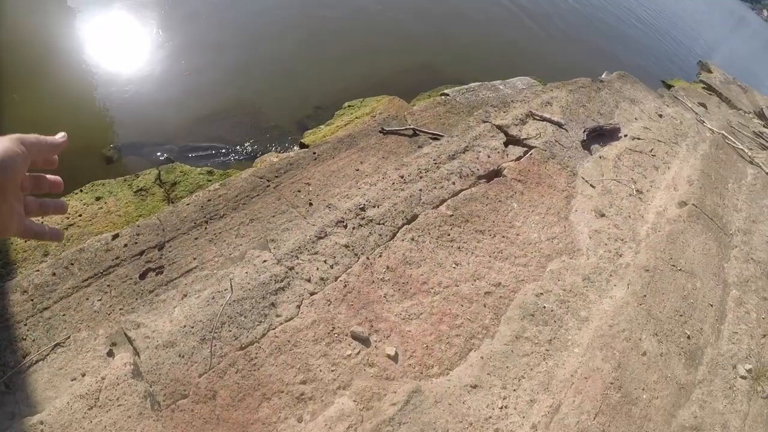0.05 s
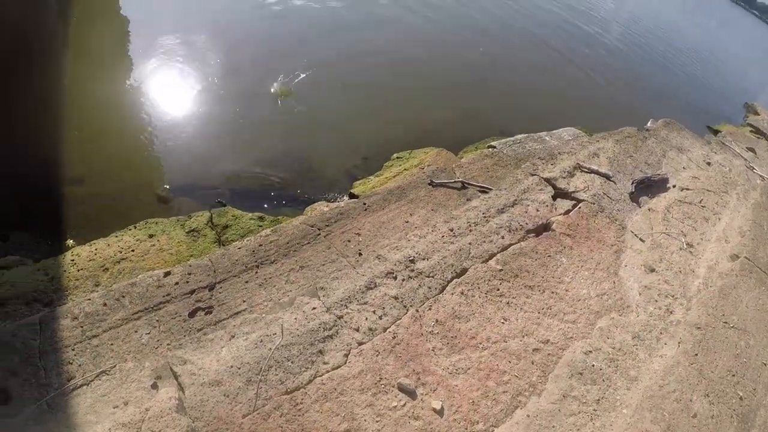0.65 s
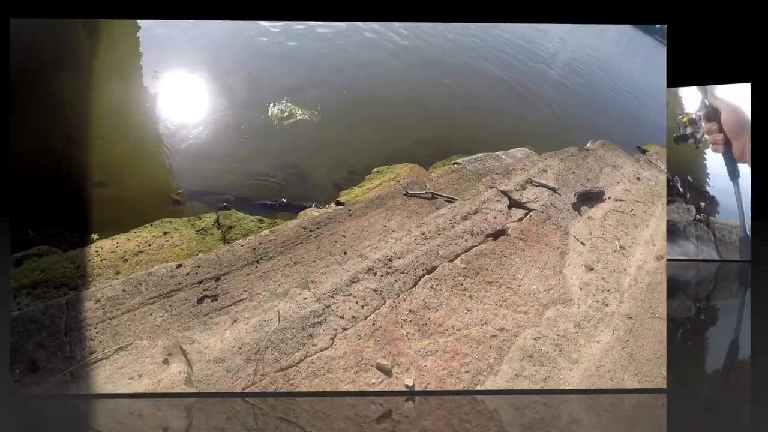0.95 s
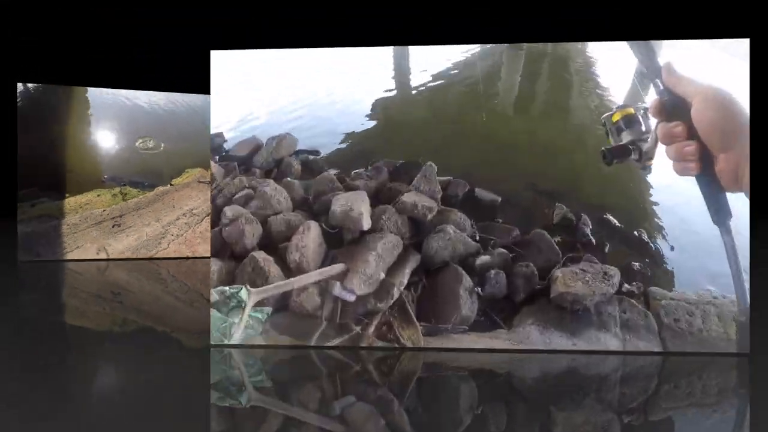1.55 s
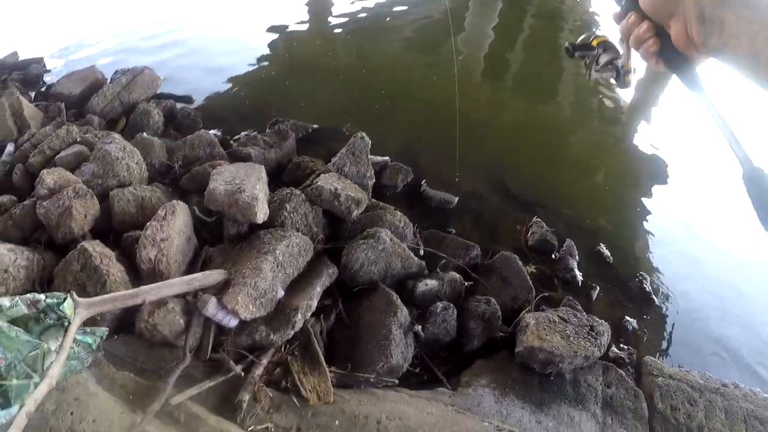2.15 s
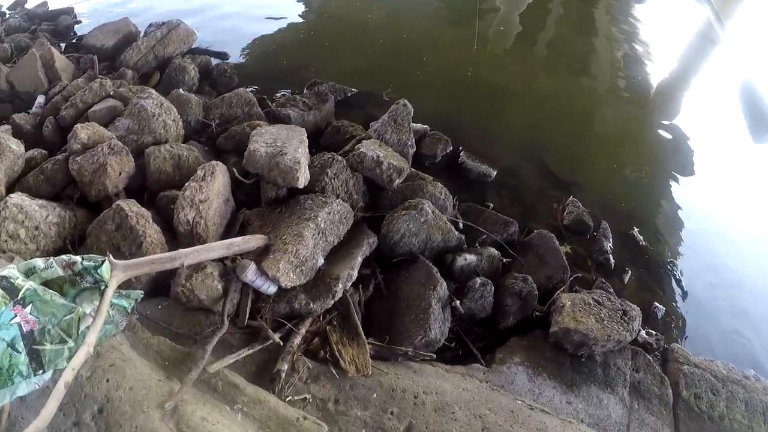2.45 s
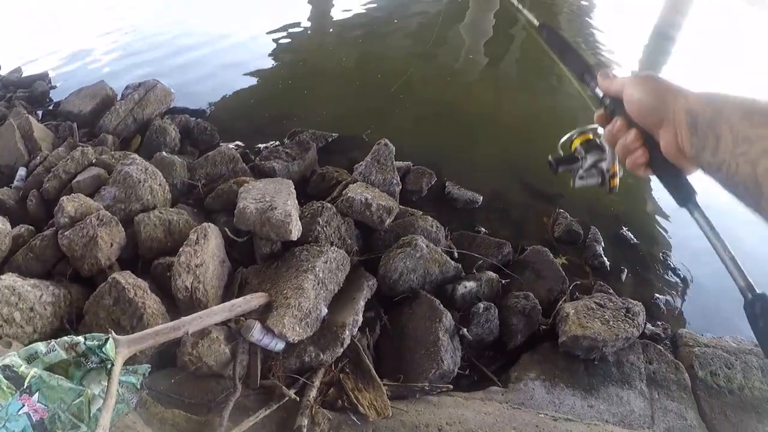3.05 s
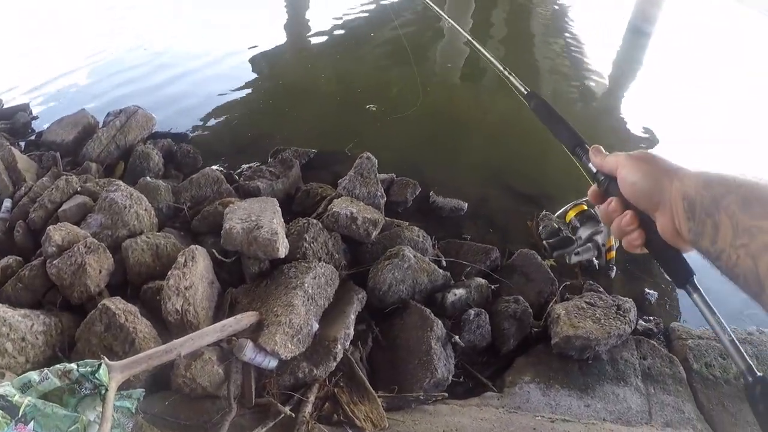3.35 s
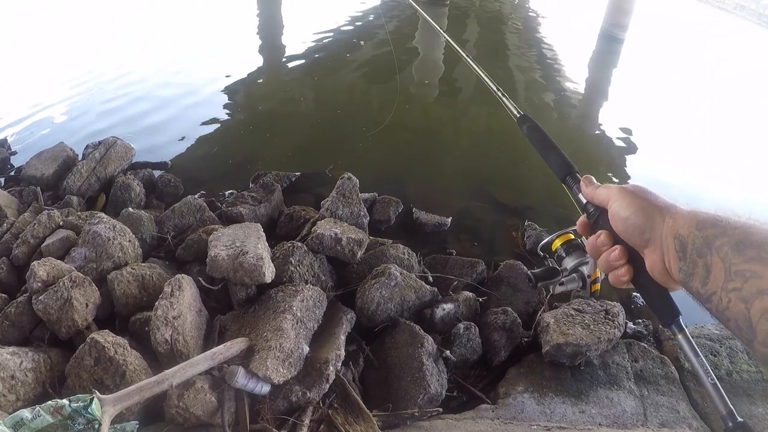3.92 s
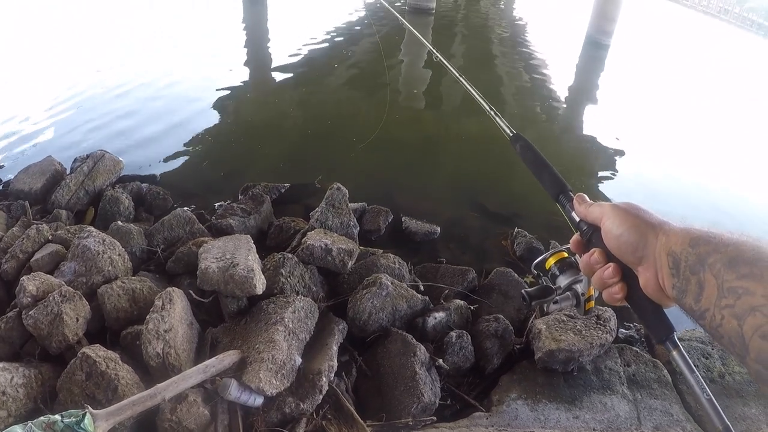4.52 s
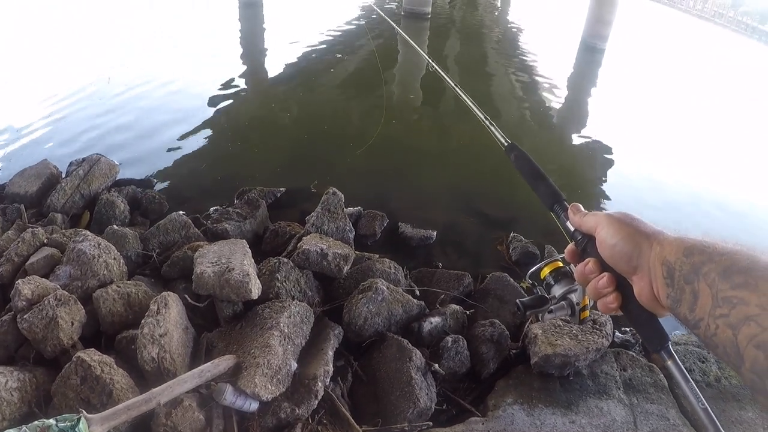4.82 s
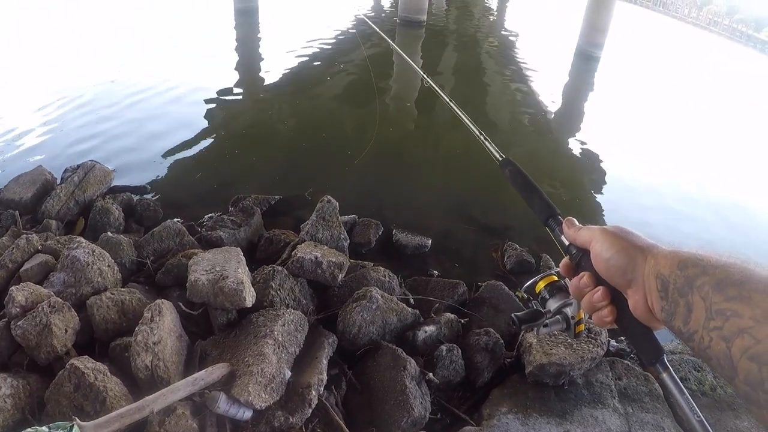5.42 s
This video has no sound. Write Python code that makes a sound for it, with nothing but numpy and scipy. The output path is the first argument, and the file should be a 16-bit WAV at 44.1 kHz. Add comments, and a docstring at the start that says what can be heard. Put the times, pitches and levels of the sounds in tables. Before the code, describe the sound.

Deep bridge rumble and tyre roar from above, broken by irregular metallic clanks and thuds that echo over the river bank.

```python
"""Heavy vehicle on a bridge

Heard from the river bank below, the rolling weight makes the deck rumble and settle into a drone.
Tyres roar, wheels bang over loose steel joints, and the blows echo between deck and water. Close by,
water spits at the bank, then comes one brief high whizz like a fishing line. A thin hiss hangs on."""
import sys
import numpy as np
from scipy import signal
from scipy.fft import rfft, irfft, next_fast_len
from scipy.io import wavfile
from scipy.ndimage import uniform_filter1d, minimum_filter1d, map_coordinates

SR = 44100
rng = np.random.default_rng(int(sys.argv[2]) if len(sys.argv) > 2 else 0)


def output_pcm(signal):
    """Save a mono or channel-first signal as 16-bit PCM at the path in sys.argv[1].

    Samples are clipped to [-1, 1] before scaling.
    """
    pcm = np.clip(np.atleast_2d(signal).T, -1, 1) * 32767
    wavfile.write(sys.argv[1], SR, np.round(pcm).astype(np.int16))


N = 250488
TIME = np.arange(N) / SR

# Levels are relative: the functions add their own gains. A fade time (t60) is the time to fall 60 dB.
# tone colour of each noise: (frequency [Hz], level [dB])
AIR_COLOUR = [(1000, -17), (2500, -1), (4400, -5.5), (5400, -10.5), (6800, -8.5), (7400, -9), (8500, -6),
              (10400, -13.5), (11300, -17), (13800, -21.5), (15000, -35)]
DECK_COLOUR = [(35, -31), (60, -18), (124, 2.5), (176, 3.5), (260, -16.5), (420, -24), (550, -79),
               (920, -120)]
ROAR_COLOUR = [(200, -23), (310, 6), (430, 3), (600, -3), (850, -7), (1200, -8.5), (1450, -27.5),
               (2200, -57.5), (6000, -120)]
RUSH_COLOUR = [(700, -10.5), (1300, 6), (2000, 2.5), (2900, -11), (4500, -13), (5600, -18), (7300, -21.5),
               (8600, -23), (10400, -26), (11500, -38.5), (15000, -49)]
BLOW_COLOUR = [(150, -5), (500, 0), (1200, -6), (1450, -13), (2100, -17.5), (3000, -26), (5000, -29.5),
               (6800, -35), (7400, -41.5), (10300, -42), (11500, -58.5), (15000, -72)]
# the thin high hiss: (time [s], level [dB])
HISS_LEVELS = [(0, -76), (.5, -64.5), (.65, -57), (1.3, -73), (2.6, -69), (3.2, -62), (5.68, -62)]
# small spits of water, then (last row) one brief high whizz like a fishing line:
# (time [s], level [dB], pitch [Hz], fade time [s])
SPITS_AND_WHIZZ = [(0.609, -38.5, 9950, 0.025), (0.628, -47, 8360, 0.07), (.66, -44, 5000, 0.046),
                   (0.694, -35, 4800, 0.11), (0.749, -38.5, 4700, 0.065), (.866, -52, 6960, .08),
                   (.948, -55, 7000, .05), (.976, -46, 4500, .05), (1.13, -38.5, 5460, 0.064),
                   (1.16, -45, 6950, 0.068), (1.699, -52, 9000, 0.2)]
# the deck's rumble under the weight: (time [s], level [dB])
RUMBLE_LEVELS = [(0, -17.5), (1.3, -17), (1.85, -12.5), (2.5, -13), (3.2, -13.0), (3.75, -14.5),
                 (4.25, -14), (4.65, -15), (5.15, -15), (5.68, -18.5)]
# axles bouncing the deck: (time [s], level [dB])
AXLE_BOUNCES = [(.06, -17.5), (.285, -15.5), (.565, -21), (1.46, -16.5), (1.70, -14), (1.83, -12),
                (2.135, -10.5), (2.19, -9), (3.12, -6.5), (4.16, -10.5), (4.28, -10.5)]
# the deck's deep tones: (pitch [Hz], first level [dB], change on arrival [dB], change on settling [dB],
# strength of the noise around the tone [ratio], width of that noise [octaves])
DECK_TONES = [(43.27, -34.5, 8.5, 2, 1.5, 0.35), (82.1, -34.5, 10.5, 6.5, 0.96, 0.2),
              (119.33, -28.5, 11, -2.5, 1.05, 0.16)]
# pitches at which the steel girders ring: (frequency [Hz], width [Hz], boost or cut [dB])
GIRDER_RESONANCES = [(360, 39, -2), (485, 16, 3.5), (546, 54, 2), (660, 36, 3), (820, 49, 3.5),
                     (1084, 22, 2), (1210, 21, -7.5), (1750, 270, 4), (2105, 570, 0.5), (4055, 1000, 5),
                     (6140, 650, 4)]
# tyres on the road: (time [s], growl and roar level [dB], rush level [dB])
TYRE_LEVELS = [(0.0, -25, -43.5), (1.09, -25.5, -41), (1.37, -26.5, -44), (1.71, -25, -41),
               (1.85, -25.5, -45.5), (2.4, -30.5, -48), (3.43, -31, -50.5), (3.54, -28.5, -43),
               (3.99, -31.5, -44), (4.3, -29, -43.5), (5.08, -28, -45), (5.68, -35.5, -48.5)]
# tones of a joint's steel plate: (pitch [Hz], level [dB], fade time [s])
PLATE_TONES = [(478, -1, .7), (582, 0, .8), (635, -3.5, .9), (690, 0, .9), (857, -3, .8), (974, -6, 1.0),
               (1103, -2, .8), (1174, -4, .9), (1228, -6, .7), (1778, -13.5, .8)]
# clang, clatter and rattle bands: (low edge [Hz], high edge [Hz], level [dB], fade time factor [ratio])
CLATTER_BANDS = [(734, 1290, -5.5, 0.87), (1390, 2940, -5.5, 1.1), (2770, 14000, -4.5, 0.96)]
# wheels hitting joints: (time [s], thud pitch [Hz], thud level [dB], clang pitch [Hz], clang level [dB],
# clatter level [dB], rattle level [dB], base fade time [s])
WHEEL_BLOWS = [(0.0, 480, -34, 1130, -27.5, -41, -51, 0.51),
               (.066, 453, -34, 1170, -20.5, -28, -40.5, 0.34),
               (.286, 252, -18, 1400, -22.5, -28, -37.5, 0.5),
               (.36, 400, -32.5, 900, -24.5, -34, -41, 0.62),
               (.41, 297, -28.5, 1060, -24, -32.5, -44.5, 0.69),
               (.561, 350, -47.5, 1030, -22.5, -31.5, -42, 0.45),
               (.783, 355, -20.5, 815, -21, -38, -55, 1.9), (.849, 435, -15.5, 1090, -23, -50, -45, 0.39),
               (.9, 350, -16.5, 1120, -19.5, -36, -53, 0.74),
               (.956, 465, -20.5, 877, -23.5, -53, -58, 0.94),
               (1.118, 450, -30.5, 890, -21, -26, -41, 0.42),
               (1.217, 400, -48.5, 1090, -29.5, -32.5, -47, 0.75),
               (1.525, 395, -25.5, 1030, -29, -34, -44.5, 0.95),
               (1.678, 387, -18, 630, -27.5, -50.5, -61, 0.8),
               (1.714, 394, -28.5, 900, -23.5, -30, -36.5, 0.62),
               (2.133, 430, -25, 870, -27, -38.5, -46.5, 0.64),
               (2.18, 418, -21, 1120, -29.5, -36, -46.5, 0.52),
               (2.49, 400, -34.5, 990, -50.5, -43.5, -51.5, 1.6),
               (2.668, 392, -24.5, 760, -27.5, -35, -44, 1.32),
               (3.084, 478, -28, 865, -38.5, -43.5, -52.5, 2.3), (3.14, 330, -28, 860, -30, -59, -54, 0.33),
               (3.378, 400, -32.5, 994, -30, -36, -47.5, .8),
               (3.41, 587, -41.5, 810, -26.5, -42, -57, 1.05), (3.49, 500, -45, 1180, -31, -39, -50.5, 1.1),
               (4.02, 397, -48, 1010, -38.5, -54.5, -48.5, 2.7),
               (4.173, 300, -22.5, 1040, -33.5, -30, -40.5, 1.5),
               (4.281, 350, -25, 980, -23.5, -29.5, -48, 0.64),
               (4.57, 457, -41, 1090, -36.5, -38.5, -55, 2), (5.027, 560, -12.5, 1155, -19, -24, -43, .58),
               (5.09, 560, -21.5, 1140, -19, -28.5, -45.5, 0.57),
               (5.145, 557, -13.5, 1140, -24.5, -30.5, -50, 0.63),
               (5.521, 537, -21.5, 820, -28, -46, -54, .27), (5.581, 510, -24, 654, -47, -57, -65, 0.81)]


def amp(db):
    """Turn decibels into a gain to multiply by."""
    return 10 ** (np.asarray(db) / 20)


def unit(x):
    """Scale a signal to an average (rms) level of 1."""
    return x / np.sqrt(np.mean(x ** 2) + 1e-20)


def colour_gain(colour, hz):
    """Read a tone colour table as a gain at each frequency."""
    points_hz, db = np.transpose(colour)
    return amp(np.interp(np.log(hz + 1), np.log(points_hz + 1), db))


def curves(rows):
    """Join a table's points in time: one curve for each column after the first."""
    times, *columns = np.transpose(rows)
    return [np.interp(TIME, times, column) for column in columns]


def ramp(start_s, length_s):
    """A straight rise from 0 to 1."""
    return np.clip((TIME - start_s) / length_s, 0, 1)


def wobble(rate):
    """A smooth curve through `rate` random values a second."""
    return map_coordinates(rng.standard_normal(int(N * rate / SR) + 4), [TIME * rate])


def noise(gain_at):
    """Noise of level 1, coloured by a gain for each frequency."""
    size = next_fast_len(N + 8192)
    spectrum = rfft(rng.standard_normal(N), size)
    hz = np.fft.rfftfreq(size, 1 / SR)
    return unit(irfft(spectrum * gain_at(hz), size)[:N])


def noise_around(centre_hz, octaves):
    """Noise of level 1 gathered around one pitch."""
    return noise(lambda hz: np.exp(-.5 * (np.log2((hz + 1) / centre_hz) / octaves) ** 2))


def steady(x, span_s):
    """Even out any swells slower than span_s."""
    size = max(int(span_s * SR), 8)
    power = uniform_filter1d(uniform_filter1d(x ** 2, size), size // 2)
    return x / np.sqrt(np.abs(power) + 1e-9)


def air(floor_db=-59, hiss_hz=6620, width_hz=260):
    """A faint, even noise and a narrow high hiss that comes and goes."""
    hiss = noise(lambda hz: np.exp(-.5 * ((hz - hiss_hz) / width_hz) ** 2))
    floor = noise(lambda hz: colour_gain(AIR_COLOUR, hz))
    return amp(floor_db) * floor + amp(curves(HISS_LEVELS)[0]) * hiss


def droplets(start_s=0.55, end_s=1.25, fade_s=.06, level_db=-58, centre_hz=6200, clump_db=4.5):
    """Fine droplets patter on the water in clumps."""
    window = ramp(start_s, fade_s) * (1 - ramp(end_s - fade_s, fade_s))
    clumps = amp(clump_db * wobble(70.4))
    return amp(level_db) * window * unit(clumps * noise_around(centre_hz, octaves=0.49))


def spits_and_whizz(octaves=0.34, grain_db=5.5, rise_share=0.019, sparkle_db=-24, sparkle_hz=11000):
    """Grainy bursts of noise: small spits of water, then one brief high whizz like a fishing line."""
    out = np.zeros(N)
    for start, db, centre_hz, t60 in SPITS_AND_WHIZZ:
        age = np.maximum(TIME - start, 0)
        burst = noise_around(centre_hz, octaves) + amp(sparkle_db) * noise_around(sparkle_hz, octaves)
        rise = 1 - np.exp(-age / (rise_share * t60))  # longer bursts start more softly
        out += amp(db - 60 * age / t60) * rise * burst
    grain = unit(amp(grain_db * wobble(830)))
    return out * grain


def deck_rumble(gain_db=-3.0, sway_db=1.5):
    """The rolling weight shakes the bridge deck, a little unevenly."""
    level = amp(curves(RUMBLE_LEVELS)[0] + gain_db + sway_db * wobble(12))
    return level * steady(noise(lambda hz: colour_gain(DECK_COLOUR, hz)), span_s=0.09)


def axle_bounces(gain_db=1, boom_hz=145, rise_s=0.013, t60=0.46):
    """Each bouncing axle gives the deck one soft, deep push that dies away."""
    power = np.zeros(N)
    for start, db in AXLE_BOUNCES:
        age = np.maximum(TIME - start, 0)
        power += (amp(db - 60 * age / t60) * np.tanh(age / rise_s)) ** 2
    boom = steady(noise_around(boom_hz, octaves=0.26), span_s=0.014)
    return amp(gain_db) * np.sqrt(power) * boom


def deck_drone(arrival_s=1.22, settling_s=4.25, build_cycles=32, drift_hz=2.36, flutter_db=3.0):
    """Three deep, rough, wavering tones swell as the vehicle arrives and shift as it settles."""
    out = np.zeros(N)
    for hz, db, arrival_db, settling_db, roughness, octaves in DECK_TONES:
        build_s = build_cycles / hz  # deeper tones swell more slowly
        swell_db = arrival_db * ramp(arrival_s, build_s) + settling_db * ramp(settling_s, build_s)
        cycles = np.cumsum(hz + drift_hz * wobble(5.9)) / SR + rng.random()
        tone = np.sqrt(2) * np.sin(2 * np.pi * cycles) + roughness * noise_around(hz, octaves)
        level = amp(db + swell_db + flutter_db * np.tanh(wobble(13)))
        out += level * steady(tone, span_s=9 / hz)
    return out


def girder_gain(hz):
    """The steel girders boost or cut some pitches of any sound passing through them."""
    return amp(sum(db / (1 + (2 * (hz - centre) / width) ** 2)
                   for centre, width, db in GIRDER_RESONANCES))


def tyres(growl_gain_db=1, growl_hz=232, roar_gain_db=-2, rush_gain_db=-2):
    """Rolling tyres growl, while their roar and brighter rush come through the girders."""
    low_db, high_db = curves(TYRE_LEVELS)
    growl = steady(noise_around(growl_hz, octaves=0.29), span_s=0.25)
    roar = noise(lambda hz: colour_gain(ROAR_COLOUR, hz) * girder_gain(hz))
    rush = noise(lambda hz: colour_gain(RUSH_COLOUR, hz) * girder_gain(hz))
    return (amp(low_db + growl_gain_db) * growl + amp(low_db + roar_gain_db) * roar
            + amp(high_db + rush_gain_db) * rush)


def plate_ring(gain_db=-10, hardness=0.7, rise_s=.008, spread_db=0.67):
    """A joint's plate rings a little differently each time, and most under the hardest blows."""
    out = np.zeros(N + SR)
    age = TIME[:SR]  # each ring gets one second
    hz, db, t60 = np.transpose(PLATE_TONES)[:, :, None]
    hardest_db = max(clang_db for _, _, _, _, clang_db, *_ in WHEEL_BLOWS)
    rise = 1 - np.exp(-age / rise_s)
    tones = amp(db - 60 * age / t60) * rise * np.exp(2j * np.pi * hz * age)
    for start, _, _, _, clang_db, *_ in WHEEL_BLOWS:
        strengths = amp(rng.normal(0, spread_db, len(tones)))
        phases = np.exp(2j * np.pi * rng.random(len(tones)))
        ring = ((strengths * phases) @ tones).real
        out[round(start * SR):][:SR] += amp(clang_db + hardness * (clang_db - hardest_db)) * ring
    return amp(gain_db) * out[:N]


def blow_shape(start, t60, rise_s=0.0057, crash_gain=0.56, crash_s=0.01, touch_db=-18, touch_s=0.0038):
    """One blow's loudness: the wheel meets the edge, a short crash, an echo between deck and water."""
    age = np.maximum(TIME - start, 0)
    touch = amp(touch_db) * np.exp(-np.abs(TIME - start) / touch_s)
    crash = crash_gain * np.exp(-age / crash_s)
    echo = amp(-60 * age / t60)
    return touch + np.tanh(age / rise_s) * (crash + echo)


def joint_clatter(flicker_db=0.56):
    """Loose steel clatters and rattles after each blow, in three bands of noise."""
    out = np.zeros(N)
    for band, (low_hz, high_hz, db, stretch) in enumerate(CLATTER_BANDS):
        power = sum((amp(db + band_levels[band]) * blow_shape(start, t60 * stretch)) ** 2
                    for start, _, _, _, *band_levels, t60 in WHEEL_BLOWS)
        band_gain = lambda hz: 1 / np.sqrt((1 + (low_hz / (hz + 1)) ** 12) * (1 + (hz / high_hz) ** 12))
        steel = noise(lambda hz: colour_gain(BLOW_COLOUR, hz) * girder_gain(hz) * band_gain(hz))
        out += np.sqrt(power) * steady(steel, span_s=0.073)
    return amp(flicker_db * wobble(110)) * out


def wheel_bangs(thud_gain_db=-4, thud_stretch=1.11, clang_gain_db=-7, clang_stretch=1.09):
    """Each blow thuds and clangs at the pitches of the part of the deck that it strikes."""
    out = np.zeros(N)
    for start, thud_hz, thud_db, clang_hz, clang_db, _, _, t60 in WHEEL_BLOWS:
        thud = steady(noise_around(thud_hz, octaves=0.35), span_s=0.014)
        clang = steady(noise_around(clang_hz, octaves=0.11), span_s=0.064)
        out += amp(thud_db + thud_gain_db) * blow_shape(start, t60 * thud_stretch) * thud
        out += amp(clang_db + clang_gain_db) * blow_shape(start, t60 * clang_stretch) * clang
    return out


def scene():
    """The bridge overhead and the river bank below, in one channel."""
    rolling = deck_rumble() + axle_bounces() + deck_drone() + tyres()
    blows = wheel_bangs() + plate_ring() + joint_clatter()
    bank = spits_and_whizz() + droplets() + air()
    return (rolling + blows + bank)[None]


def record(dry, ceiling=.96, fade_s=.004, top_hz=15100):
    """Turn down peaks near full scale, fade the very end and cut the highest treble."""
    size = SR // 125  # 8 ms
    needed_gain = np.minimum(1, ceiling / (np.abs(dry[0]) + 1e-9))
    held_gain = minimum_filter1d(needed_gain, 2 * size)
    smooth_gain = uniform_filter1d(uniform_filter1d(held_gain, size), size)
    fade = np.sin(np.pi / 2 * np.minimum(1, (TIME[-1] - TIME) / fade_s))
    low_pass = signal.ellip(10, .1, 80, top_hz, fs=SR, output="sos")
    return signal.sosfilt(low_pass, dry[0] * smooth_gain * fade)[None]


dry = scene()
out = record(dry)
output_pcm(out)
```